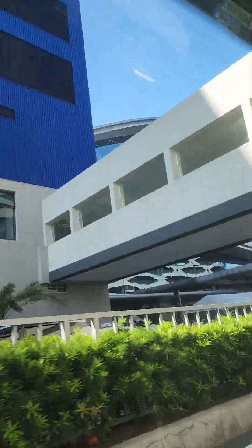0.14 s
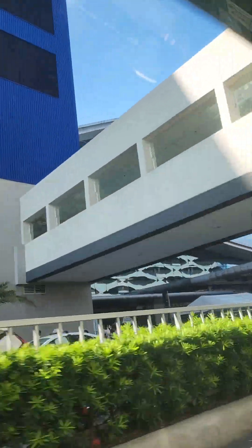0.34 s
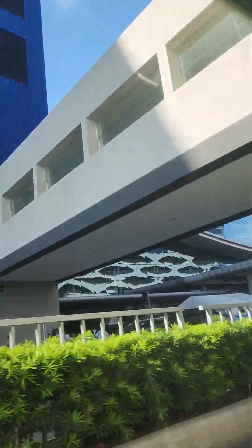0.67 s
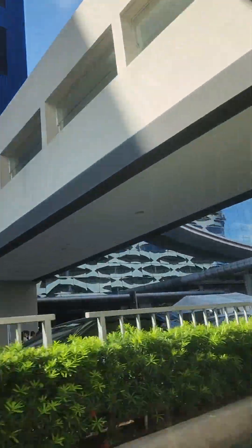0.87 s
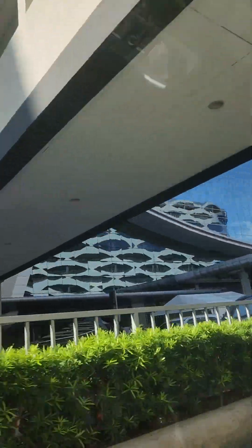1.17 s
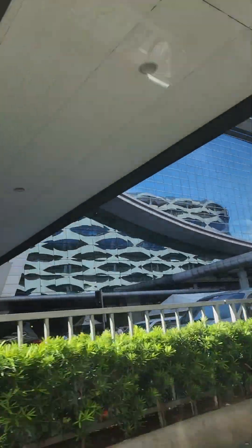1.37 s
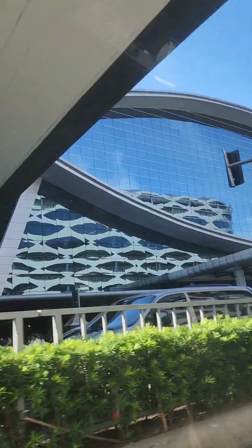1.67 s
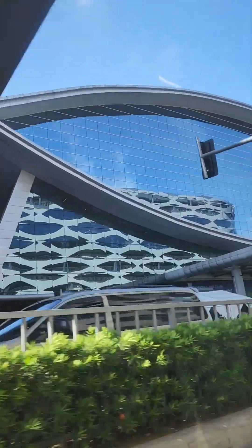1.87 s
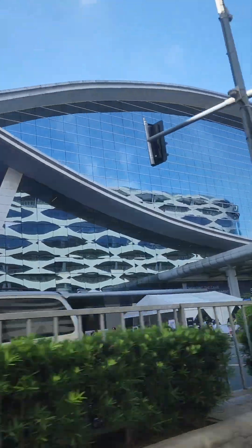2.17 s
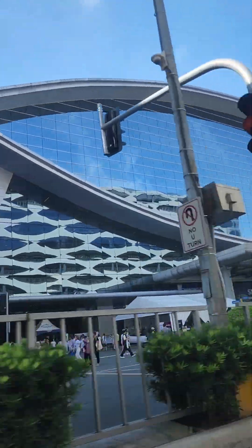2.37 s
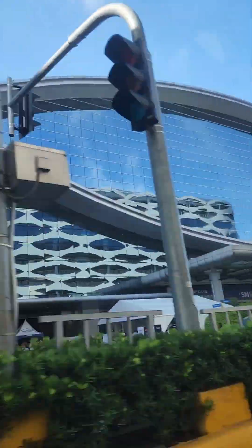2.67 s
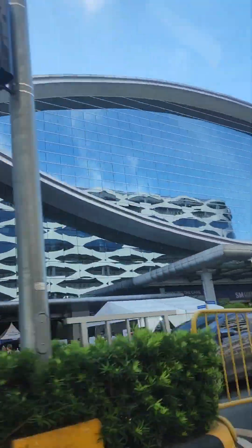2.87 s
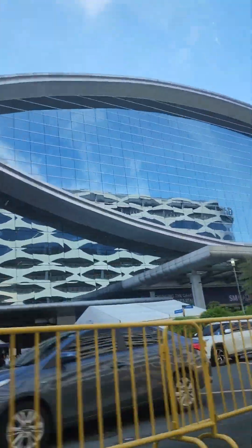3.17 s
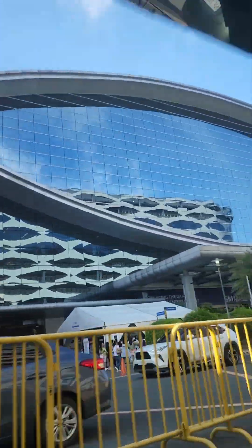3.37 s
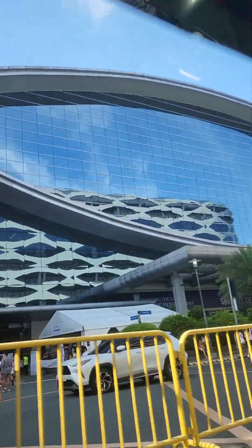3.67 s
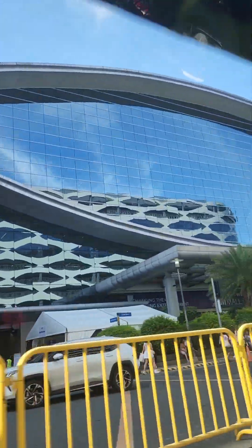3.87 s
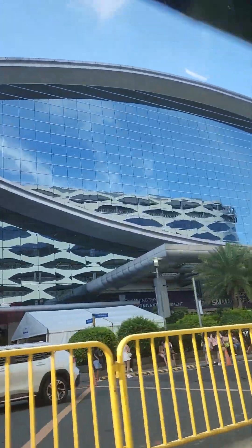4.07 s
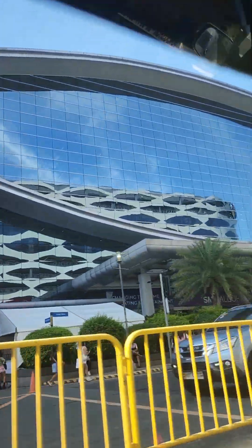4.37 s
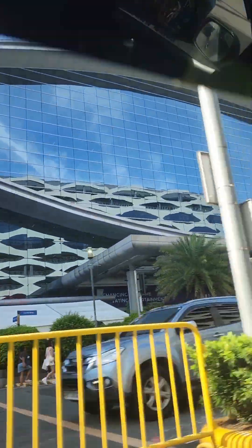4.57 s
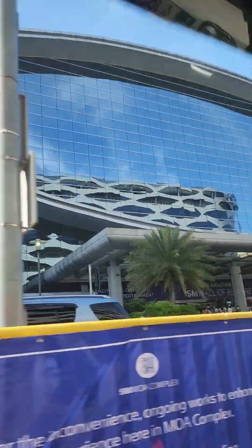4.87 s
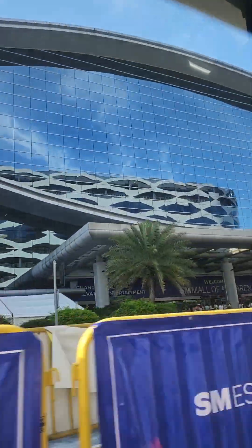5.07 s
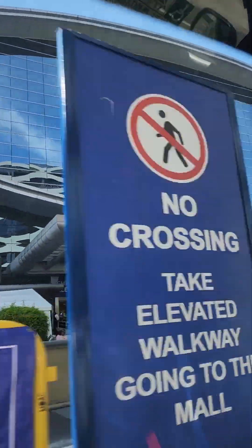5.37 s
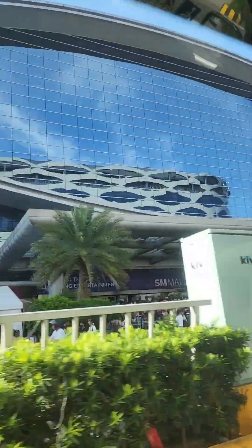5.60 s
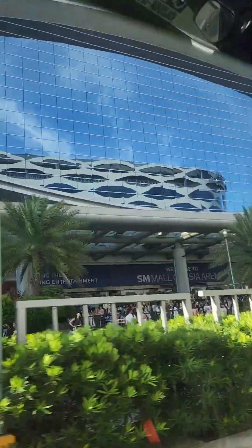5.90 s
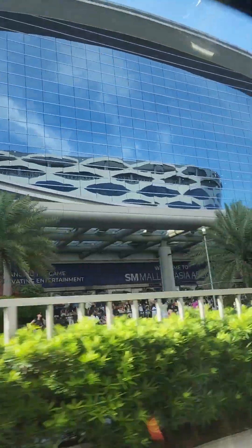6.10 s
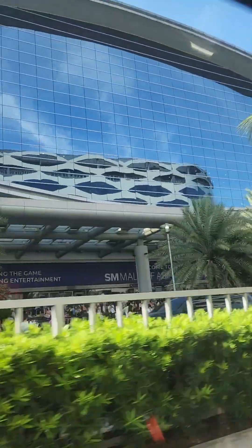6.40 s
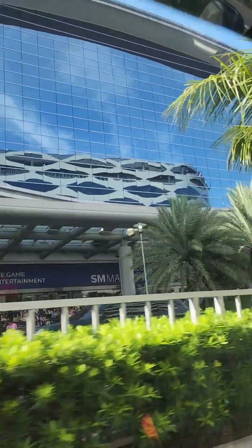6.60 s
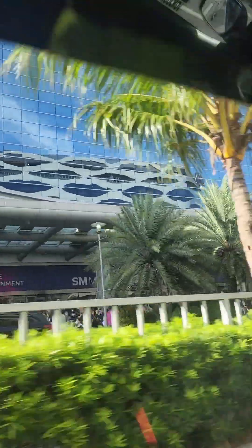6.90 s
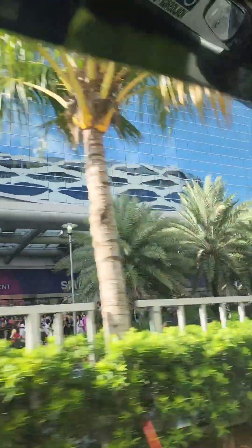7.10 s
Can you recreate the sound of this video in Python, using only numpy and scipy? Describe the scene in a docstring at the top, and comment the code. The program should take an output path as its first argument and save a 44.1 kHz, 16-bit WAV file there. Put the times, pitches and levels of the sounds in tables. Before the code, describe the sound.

Inside a slowly moving car, close stereo microphones at the passenger seat. From 0 to 2.4 s a steady deep rumble and boomy panel drone fill the cabin, over a soft low engine hum near 50 Hz, dull muffled tyre roar and faint vent hiss with a sizzle of coarse tread; gentle dips make the bass swell around 1 s. At 2.4 s a rough stretch begins: strong low heaves, clustered hollow suspension knocks and shuddering panels, plastic ticks and short rattles, with hard bright snaps at 2.6 and 2.9 s. Around 3.1 s the coarse sizzle fades and the roar eases; knocks thin out by 3.5 s, with a heavy thud at 3.65. From 4.2 to 5.9 s the engine hum swells, then rises slightly in pitch, while irregular seam thumps and tiny trim ticks continue. After 6 s everything smooths into a softer, quieter rumble, with a low boom near 7.1 s.

```python
"""Inside a car rolling slowly along a city street, heard at the passenger seat by two close microphones.
Shaped noise makes the body's deep rumble and the cabin's drone over a soft engine hum of a few sines.
The tyres roar dully and the vents hiss; the roar eases and a sizzle of tread ends with the coarse asphalt.
Dips rock the car; a rough stretch and later seams strike decaying knocks from the suspension,
and short noise bursts and crowds of clicks make loose trim tick, snap and rattle."""
import sys
import numpy as np
from scipy import signal
from scipy.fft import rfft, irfft, next_fast_len
from scipy.io import wavfile
from scipy.ndimage import uniform_filter1d

SR = 44100
rng = np.random.default_rng(int(sys.argv[2]) if len(sys.argv) > 2 else 0)


def unload_audio(sound):
    """Save the sound as a 16-bit wav file, at the path given as the first command line argument."""
    columns = np.transpose(np.atleast_2d(sound))
    # keep every value between -1 and 1, then stretch to whole-number steps
    steps = np.round(np.clip(columns, -1, 1) * 32767)
    wavfile.write(sys.argv[1], SR, steps.astype(np.int16))


N = 319706
TIME = np.arange(N) / SR  # s

# How rough the road is, driving several layers together. Each row: time in seconds, roughness in dB.
ROAD_ROUGHNESS = [(0, 0), (.7, -1.8), (2.3, -0.5), (2.85, -1), (3.25, 2.5), (3.55, -4), (3.85, -5),
                  (4.2, -2.5), (4.6, -2.5), (5, -1.5), (5.8, -2), (6.25, -5.5), (7.25, -6)]
# Coarse asphalt gives way to a quieter surface; the crossing is a smooth step.
COARSE_ENDS_S, CROSSING_S, COARSE_ROAR_DB = 3.14, 0.083, 2.5
# Levels at roughness 0 dB, and the dB that each gains per dB of roughness.
HEAVE_DB, HEAVE_PER_DB = -21.5, 0.66
BOOM_DB, BOOM_PER_DB = -17.5, 1.45
TYRE_DB, TYRE_PER_DB = -34, 0.81
VENT_DB, HISS_PER_DB = -49.5, 0.09
SIZZLE_DB = -50  # on coarse asphalt
# Slow wavering of narrow bands.
BOOM_DRIFT_DB, TYRE_DRIFT_DB, VENT_DRIFT_DB, SIZZLE_DRIFT_DB = 2.0, 1.34, 1.64, 2

# Balance of the cabin at the microphones. Each row: frequency in Hz, left minus right in dB.
LEFT_RIGHT_LEAN = [(50, 0.45), (200, 0), (320, 2.5), (480, -1.5), (800, -1), (1250, 1), (1650, -4),
                   (2300, -7.5), (3500, 0.5), (4500, -3.5), (6500, -2), (9300, -5.5), (11000, -2),
                   (14000, 1)]
# Spread of the cabin sound. Each row: frequency in Hz, side minus mid in dB.
STEREO_WIDTH = [(30, -23.5), (90, -24), (135, -21.5), (180, -19), (300, -18.5), (550, -6.5), (900, -0.5),
                (1250, 2.5), (2000, -2.5), (3000, 0), (5000, 0.5)]
# Hollow resonances of ducts and dashboard, which each source takes up more or less strongly.
# Each row: frequency in Hz, width in Hz, lift in dB at full weight.
DUCT_RESONANCES = [(659, 8.7, 11), (1282, 71, 7.5), (1658, 45, 8), (1970, 12, 5.5), (2040, 72, 5.5),
                   (4776, 24, -1.5), (6330, 60, 5.5), (7400, 100, 4.5), (9630, 14, 4)]

# Colour of the vent hiss. Each row: frequency in Hz, relative level in dB per Hz.
VENT_COLOUR = [(300, 6), (1000, -7.5), (1450, 2.5), (2150, 1.5), (2800, -1.5), (3600, -7.5), (4800, -6.5),
               (5700, -9.5), (6400, -7.5), (7500, -10), (9000, -18), (10300, -18.5), (11200, -22.5),
               (13600, -20.5), (16000, -24.5)]
# Colour of the tread's extra hiss on coarse asphalt. Each row: frequency in Hz, relative level in dB per Hz.
SIZZLE_COLOUR = [(300, 7), (1000, -1.5), (1500, 2), (2150, 0), (2900, -1.5), (3500, -8.5), (4800, -4.5),
                 (5800, -8), (6300, -2), (6700, -7.5), (7600, -8.5), (8400, -10.5), (9200, -18.5),
                 (10300, -15.5), (11200, -23.5), (13600, -15.5), (15500, -20)]

# Colour of struck loose trim. Each row: frequency in Hz, relative level in dB per Hz.
TRIM_COLOUR = [(150, -18.5), (400, -6), (1000, 11), (2500, 2), (4000, -4.5), (7300, -6.5), (8500, -12),
               (14000, -18.5), (16000, -17.5)]
# Loose trim set rattling, each bout swelling and dying away.
# Each row: loudest at seconds, level in dB, half length in seconds, bright above Hz.
RATTLE_BOUTS = [(2.52, -49, 0.057, 1500), (2.877, -48, 0.022, 3500), (3.031, -63, 0.026, 1190),
                (3.256, -56.5, .11, 3000), (3.402, -55, 0.033, 1000), (4.247, -59, 0.045, 3000),
                (5.096, -58, 0.028, 500), (5.69, -57, .03, 500), (5.76, -51, 0.033, 488)]
RATTLE_REST_DB = -67  # the faint chatter between bouts, at roughness 0 dB
# Small plastic parts ticking. Each row: start in seconds, level in dB before a common 13 dB cut,
# ring in Hz, ring width in Hz, ring lift in dB, contact decay in seconds, left minus right in dB.
TRIM_TICKS = [(2.4452, -33, 3120, 900, 15, 0.00081, 4), (2.5125, -40, 3800, 1600, 4, .0015, 2),
              (2.7145, -37, 3200, 1300, 12, 0.003, 2), (2.7516, -39, 4300, 1800, 8, 0.0065, 3),
              (2.834, -40, 3830, 1500, 10, .003, 3), (3.045, -40, 5900, 2010, 18, .004, -1),
              (3.262, -42, 7560, 3000, 10, .0015, 2), (4.219, -40, 5010, 2000, 4, 0.0022, -3),
              (4.272, -42, 12200, 4800, 10, .0015, -3), (4.605, -40, 11900, 4800, 7, 0.00093, -3),
              (4.733, -43, 5000, 2000, 7, .001, -3), (5.574, -41, 2000, 800, 10, 0.0028, -1),
              (5.677, -40, 3480, 2000, 6, 0.002, 6), (5.711, -40, 4500, 1800, 2, .003, 1)]
# A stiff panel snapping in its clips on the hardest jolts.
# Each row: start in seconds, level in dB, ring in Hz, ring lift in dB.
PANEL_SNAPS = [(2.5946, -32.5, 6600, 2), (2.9092, -32.5, 6700, 11.5)]
# Colour of a snap. Each row: frequency in Hz, relative level in dB per Hz.
SNAP_COLOUR_CURVE = [(150, -4), (400, 7.5), (750, 0), (1250, -5), (2000, -13), (3200, -17), (4700, -18.5),
                     (7300, -16), (8500, -25), (9500, -28), (12500, -23), (16000, -27)]
# The right microphone faces away from the panel. Each row: frequency in Hz, gain in dB.
RIGHT_SHADE = [(600, 0), (1250, -5), (2500, -4), (7000, -10), (14000, -14)]
SNAP_SWEEP_HZ_PER_S = 8900000  # each snap zips upward from a dull knock to a bright crack

# Colour of the tyre roar. Each row: frequency in Hz, relative level in dB per Hz.
TYRE_COLOUR = [(120, -6), (230, 2), (310, -1), (355, -4), (395, 3), (500, -4.5), (580, -8.5), (740, -14),
               (930, -12), (1150, -22.5), (1600, -27.5), (3000, -41), (16000, -80)]

# The engine's course. Each row: time in seconds, mean firing rate in Hz, level in dB before a 2.5 dB cut.
ENGINE_COURSE = [(0, 48.4, -32.5), (.6, 46.2, -33), (1.8, 46.3, -30.5), (2.5, 50.12, -23),
                 (3.6, 48.86, -31), (4.5, 50.1, -18), (5.05, 55.35, -23), (5.8, 55, -25.5),
                 (6.3, 50, -32.5), (7.25, 49.1, -38)]
# Harmonics of the hum. Each row: multiple of the firing rate, relative level in dB before it wanders.
FIRING_ORDERS = [(1, 5), (2, -18), (3, -28), (4, -11.5)]

# The drone, a broad air resonance above the boom. Each row: time in seconds, level in dB before the trim.
DRONE_LEVEL = [(0, -30), (.4, -26), (1.5, -29), (2.05, -26), (2.9, -26.5), (3.4, -29.5), (3.7, -31.5),
               (4.05, -30), (4.6, -31), (5.9, -28), (6.3, -33), (7.25, -36.5)]
DRONE_TRIM_DB = -1
# Colour of the drone. Each row: frequency in Hz, relative level in dB per Hz.
DRONE_CURVE = [(100, -39.5), (145, -8.5), (165, -1.5), (187, -3), (212, -15.5), (300, -44), (2000, -130)]

# Small pits and stones between the big dents. Each row: time in seconds, level in dB.
GRUMBLE_LEVEL = [(0, -42.5), (2.3, -42.5), (2.45, -37), (3.4, -36.5), (3.55, -49), (4.1, -41.5),
                 (4.5, -39.5), (5.7, -42.5), (6.2, -43.5), (7.25, -46.5)]
PITS_PER_S, PIT_LOW_HZ, PIT_HIGH_HZ, PIT_SPREAD_DB = 130, 219.5, 639.6, 2
# Wheels meeting seams and dents. Each row: start in seconds, knock in dB, knock ring in Hz,
# shudder in dB before a common 13 dB cut, shudder decay in seconds, shudder tilt in dB per octave.
WHEEL_BUMPS = [(2.418, -20, 370, -20.5, 0.09, 4), (2.485, -24, 543, -17, 0.015, -3.5),
               (2.551, -18, 237, -20, 0.01, 3.5), (2.596, -15, 251, -9.5, 0.0079, -4),
               (2.622, -28, 372, -29, 0.0067, 0), (2.694, -23, 276, -44, 0.013, 1),
               (2.718, -35, 610, -30, .015, 3), (2.752, -23.5, 446, -28, 0.018, 3),
               (2.84, -19.5, 481, -20, 0.043, 3.5), (2.879, -33.5, 714, -39, 0.016, 8),
               (2.903, -14, 254, -18, 0.01, 3.5), (2.98, -32, 510, -18.5, 0.042, -1),
               (3.016, -25, 366, -22, 0.032, 4), (3.087, -18, 302, -31, 0.02, 0),
               (3.155, -25, 427, -34, 0.016, 7), (3.221, -28, 252, -19, .035, 3),
               (3.248, -31, 540, -31, 0.022, 1), (3.299, -24.5, 466, -25, 0.021, -10),
               (3.378, -20, 296, -24, 0.03, 2.5), (3.39, -20.5, 330, -34, .012, 5.5),
               (3.463, -29, 300, -36, 0.0082, 5.5), (3.664, -20, 315, -10.5, 0.035, -8),
               (3.834, -26, 400, -27, .025, 1), (4.164, -35, 420, -17.5, 0.015, -9.5),
               (4.372, -19.5, 286, -30, 0.027, -7), (4.443, -34, 228, -15.5, 0.013, -7),
               (4.488, -29, 420, -26.5, 0.023, 1.5), (4.66, -19, 321, -15, 0.046, -4.5),
               (4.796, -23, 347, -18.5, 0.023, -3), (4.92, -25, 438, -22.5, 0.044, 2),
               (4.967, -22.5, 377, -18, 0.023, 0), (5.079, -24, 426, -22, 0.043, 3),
               (5.101, -21, 308, -28.5, 0.01, -4.5), (5.243, -26, 229, -24, 0.011, 2.5),
               (5.412, -17.5, 305, -17.5, 0.019, -2), (5.425, -26, 520, -31.5, 0.018, 4.5),
               (5.504, -37, 593, -35, .012, 1), (5.522, -29, 423, -41, 0.013, 0),
               (5.612, -25, 375, -26.5, 0.021, 3.5), (5.666, -31, 256, -26, 0.052, 4.5),
               (5.78, -24, 386, -38, .012, 5), (5.879, -27, 410, -29, 0.014, 0)]
# Colour of the panels' shudder before its tilt. Each row: frequency in Hz, relative level in dB per Hz.
SHUDDER_COLOUR = [(40, -9), (110, 9.5), (200, 3.5), (320, 0.5), (450, -7), (620, -13.5), (1000, -24.5),
                  (2500, -43.5), (16000, -81)]
# Colour of the tread's crunch. Each row: frequency in Hz, relative level in dB per Hz.
CRUNCH_COLOUR = [(200, -18), (450, 1.5), (800, -5.5), (1200, -11.5), (2500, -27.5), (16000, -72)]
CRUNCH_DB, CRUNCH_S = -15.5, 0.0096  # level against the knock, decay
BUMP_RISE_S = 0.0071
KNOCK_S = 0.0049  # time a knock takes to peak; it dies away about as fast
KNOCK_LAG_S = 0.00023  # a knock reaches the right microphone this much later

# Colour of the suspension's heave. Each row: frequency in Hz, relative level in dB per Hz.
HEAVE_COLOUR = [(10, -32.5), (21, -20.5), (29, 2), (32, -4), (38, -5.5), (46, 4.5), (56, 3), (65, -1),
                (85, -22.5), (2000, -130)]
# Colour of the booming panels. Each row: frequency in Hz, relative level in dB per Hz.
BOOM_COLOUR = [(40, -22), (64, -4.5), (80, -1.5), (92, 3), (108, -5), (122, 0), (138, -7), (188, -14),
               (212, -26), (300, -29), (4000, -120)]
# Long dips that rock the car and set its panels booming.
# Each row: deepest at seconds, heave change in dB, boom change in dB.
ROAD_DIPS = [(.22, -2, 2.5), (1.04, -2, 5.5), (1.291, -6, 4.5), (1.95, 4.5, 1.5), (2.5, 14.5, 1),
             (2.81, 9.5, 2.5), (3.07, 6.5, -0.5), (4.39, 2, 4), (4.8, 3, 3), (5.11, 2.5, 3.5),
             (5.45, 7.5, 3.5), (5.72, 7.5, 2.5), (5.951, 0, 6.5), (7.12, -14, 8.5)]
DIP_S = 0.051  # half length of a dip
TOP_HZ = 15700


def undb(db):
    """Decibels to gain."""
    return 10 ** (np.asarray(db) / 20)


def unit(x):
    """Scale to rms 1."""
    return x / np.sqrt(np.mean(x ** 2))


def curves(table):
    """The columns of a time table, sample by sample."""
    s, *columns = np.transpose(table)
    return [np.interp(TIME, s, c) for c in columns]


def swell(s, half_s):
    """A smooth rise to 1 at time s and back."""
    return np.exp(-((TIME - s) / half_s) ** 2)


def walk(rate):
    """A smooth random wander of spread 1, slower than about rate in Hz."""
    size = next_fast_len(N)
    f = np.fft.rfftfreq(size, 1 / SR)
    slow = rfft(rng.standard_normal(size)) * np.exp(-(f / rate) ** 2)
    return unit(irfft(slow, size)[:N])


def gains(points, size):
    """A (Hz, dB) table as gains on the bins of a transform."""
    hz, db = np.transpose(points)
    f = np.fft.rfftfreq(size, 1 / SR)
    return undb(np.interp(np.log(f + 1), np.log(hz), db))


def resonances(modes, size):
    """Gains of bell-shaped resonances on the bins of a transform."""
    f = np.fft.rfftfreq(size, 1 / SR)
    return undb(sum(db / (1 + (2 * (f - hz) / width) ** 2) for hz, width, db in modes))


def reflections(count=80):
    """Early echoes off glass and dashboard, 5 to 30 ms late, ripple the spectrum differently at each microphone."""
    echoes = np.zeros((2, N))
    for port in echoes:
        port[rng.integers(SR // 200, SR // 33, count)] = rng.standard_normal(count)
    return undb(1.2 * unit(rfft(echoes).real))


def ring(x, gain):
    """Pass x through a causal body with these gains: it rings only after it is struck."""
    size = x.shape[-1]
    cepstrum = irfft(np.log(gain), size)  # folded forward in time for minimum phase
    cepstrum[1:size // 2] *= 2
    cepstrum[size // 2 + 1:] = 0
    return irfft(rfft(x) * np.exp(rfft(cepstrum)), size)


def cabin_noise(size):
    """Diffuse sound at two microphones: alike in the bass, unrelated in the treble, uneven left to right."""
    mid, side = rfft(rng.standard_normal((2, size)))
    width = gains(STEREO_WIDTH, size)
    lean = gains(LEFT_RIGHT_LEAN, size) ** .5
    pair = np.array([(mid + width * side) * lean, (mid - width * side) / lean])
    return irfft(pair / np.sqrt(1 + width ** 2), size)


def burst(envelope):
    """A short burst of noise with an even spectrum, free of chance holes."""
    spectrum = rfft(rng.standard_normal(len(envelope)) * envelope)
    local_power = uniform_filter1d(abs(spectrum) ** 2, size=41)
    return irfft(spectrum / np.sqrt(local_power + 1e-18), len(envelope))


def steady(x, seconds, share):
    """Take a share of the slow chance swells out of a noise."""
    power = uniform_filter1d(np.mean(x ** 2, axis=0), max(int(seconds * SR), 2))
    return unit(x / power ** (min(share, 1) / 2))


def drift(x, depth_db, size=2048, count=11):
    """Narrow bands swell and fade on their own over a few tenths of a second, so the colour never sits still."""
    bands = signal.stft(x, nperseg=size)[2]
    wander = uniform_filter1d(rng.standard_normal(bands.shape[1:]), size=3, axis=0)
    for _ in range(2):
        wander = uniform_filter1d(wander, count, axis=1)
    moving = bands * undb(depth_db * unit(wander))
    return unit(signal.istft(moving, nperseg=size)[1][:, :N])


def add(out, s, sound):
    """Mix a short sound in at time s, with its ends eased."""
    start, size = int(s * SR), sound.shape[1]
    ease = np.interp(np.arange(size), [0, 30, size / 2, size], [0, 1, 1, 0])
    out[:, start:start + size] += (sound * ease)[:, :N - start]


def vents(level_db):
    """Air and road hiss come out of the dashboard ducts and sound their resonances."""
    colour = gains(VENT_COLOUR, N) * resonances(DUCT_RESONANCES, N) * reflections()
    hiss = irfft(rfft(cabin_noise(N)) * colour, N)
    return drift(hiss, VENT_DRIFT_DB) * undb(level_db + .5 * walk(39))


def sizzle(coarse):
    """Coarse asphalt adds a restless hiss that leaks in around the windows."""
    colour = gains(SIZZLE_COLOUR, N) * resonances(DUCT_RESONANCES, N) ** 1.4 * reflections()
    hiss = irfft(rfft(cabin_noise(N)) * colour, N)
    return drift(hiss, SIZZLE_DRIFT_DB) * coarse * undb(SIZZLE_DB + 1.6 * walk(20))


def chatter(rough_db, per_second=1100, rest_hz=3000):
    """Shaken trim rubs in a crowd of tiny clicks: faintly all the time, louder in short bouts."""
    struck = rng.random((2, N)) < per_second / SR
    sizes = undb(3 * np.minimum(rng.exponential(size=(2, N)), 4))
    clicks = ring(struck * rng.choice([-1, 1], (2, N)) * sizes, gains(TRIM_COLOUR, N))

    def bright(hz):
        """The clicks with their low end thinned, at rms 1."""
        return unit(signal.sosfilt(signal.butter(1, hz, "high", fs=SR, output="sos"), clicks))

    bouts = sum(bright(hz) * undb(db) * swell(s, half_s) for s, db, half_s, hz in RATTLE_BOUTS)
    return bouts + bright(rest_hz) * undb(RATTLE_REST_DB + rough_db + 2.4 * walk(22))


def ticks(tail_s=0.012, tail_db=-36, size=2048):
    """Trim taps against its clip: a hard contact, a brief plastic ring and a trace of cabin echo."""
    out, t = np.zeros((2, N)), np.arange(size) / SR
    for s, db, hz, width_hz, lift_db, contact_s, pan_db in TRIM_TICKS:
        strike = np.exp(-t / contact_s) + undb(tail_db) * np.exp(-t / tail_s)
        plastic = gains(TRIM_COLOUR, size) * resonances([(hz, width_hz, lift_db)], size)
        tick = np.array([unit(ring(burst(strike), plastic)) for port in range(2)])
        pan = np.array([pan_db, -pan_db])[:, None] / 2
        add(out, s, tick * undb(db - 13 + pan))
    return out


def snaps(ring_width_hz=1400, echo_s=0.0051, echo_db=-13, size=2048):
    """A panel lets go in one hard, broad crack that sweeps upward in 2 to 3 ms; the cabin echoes it briefly."""
    out, t, f = np.zeros((2, N)), np.arange(size) / SR, np.fft.rfftfreq(size, 1 / SR)
    sweep = np.exp(-1j * np.pi * f ** 2 / SNAP_SWEEP_HZ_PER_S)  # higher frequencies come later
    crack = np.roll(irfft(sweep, size), 32)
    for s, db, hz, lift_db in PANEL_SNAPS:
        panel = gains(SNAP_COLOUR_CURVE, size) * resonances([(hz, ring_width_hz, lift_db)], size)
        left = unit(ring(crack, panel))
        right = ring(left, gains(RIGHT_SHADE, size))
        echo = unit(ring(cabin_noise(size) * np.exp(-t / echo_s), gains(TRIM_COLOUR, size)))
        add(out, s, (np.array([left, right]) + undb(echo_db) * echo) * undb(db))
    return out


def tyres(level_db):
    """Tread on asphalt, muffled by the doors, fluttering with the grain of the road."""
    colour = gains(TYRE_COLOUR, N) * resonances(DUCT_RESONANCES, N) ** 0.6 * reflections()
    roar = drift(irfft(rfft(cabin_noise(N)) * colour, N), TYRE_DRIFT_DB)
    return steady(roar, seconds=0.029, share=0.18) * undb(level_db + 0.81 * walk(4.7))


def engine():
    """Even firings, felt through the mounts as a slightly unsteady hum."""
    hz, level_db = curves(ENGINE_COURSE)
    unsteady_hz = hz * (1 + 0.01494 * walk(6.81))
    phase = 2 * np.pi * np.cumsum(unsteady_hz) / SR
    hum = sum(undb(db + 5.7 * walk(4.5)) * np.sin(multiple * phase) for multiple, db in FIRING_ORDERS)
    return unit(hum) * undb(level_db - 2.5)


def drone():
    """Road vibration keeps the air in the cabin droning, swelling and fading on its own."""
    level_db, = curves(DRONE_LEVEL)
    air = ring(cabin_noise(N), gains(DRONE_CURVE, N))
    return steady(air, seconds=0.21, share=0.96) * undb(level_db + DRONE_TRIM_DB)


def knock(hz, size):
    """A few cycles of hollow ring from the suspension, at both microphones."""
    t = np.arange(size) / SR
    age = np.maximum([t, t - KNOCK_LAG_S], 0)
    envelope = age / KNOCK_S * np.exp(1 - age / KNOCK_S)
    return envelope * np.sin(2 * np.pi * hz * age)


def grumble(size=1536):
    """Small pits keep the suspension knocking irregularly; the higher knocks tend to be weaker."""
    out, (level_db,) = np.zeros((2, N)), curves(GRUMBLE_LEVEL)
    for when, pitch, strength in rng.random((int(PITS_PER_S * N / SR), 3)):
        hz = PIT_LOW_HZ * (PIT_HIGH_HZ / PIT_LOW_HZ) ** pitch
        force = undb(-PIT_SPREAD_DB * np.log(1 - strength)) / hz ** 1.05
        add(out, when * N / SR, knock(hz, size) * force)
    return steady(out, seconds=0.09, share=0.46) * undb(level_db)


def bumps(size=8192):
    """Each dent crunches under the tread and knocks the suspension while panels shudder, deeper if tilted down."""
    out, t = np.zeros((2, N)), np.arange(size) / SR
    rise = 1 - np.exp(-t / BUMP_RISE_S)
    for s, knock_db, hz, shudder_db, decay_s, tilt_db in WHEEL_BUMPS:
        colour = gains([(f, lift + tilt_db * np.log2(f)) for f, lift in SHUDDER_COLOUR], size)
        shudder = unit(ring(cabin_noise(size) * rise * np.exp(-t / decay_s), colour))
        grit = unit(ring(cabin_noise(size), gains(CRUNCH_COLOUR, size)))
        crunch = grit * rise * np.exp(-t / CRUNCH_S)
        blow = (knock(hz, size) + crunch * undb(CRUNCH_DB)) * undb(knock_db)
        add(out, s, blow + shudder * undb(shudder_db - 13.0))
    return out


def body(rough_db):
    """The suspension heaves slowly while panels boom at the low cabin modes; roughness and dips set both levels."""
    heave_db = HEAVE_DB + HEAVE_PER_DB * rough_db
    boom_db = BOOM_DB + BOOM_PER_DB * rough_db
    for s, heave_change_db, boom_change_db in ROAD_DIPS:
        dip = swell(s, DIP_S)
        heave_db = heave_db + heave_change_db * dip
        boom_db = boom_db + boom_change_db * dip
    heave = steady(ring(cabin_noise(N), gains(HEAVE_COLOUR, N)), seconds=0.06, share=0.81)
    panels = drift(ring(cabin_noise(N), gains(BOOM_COLOUR, N)), BOOM_DRIFT_DB)
    boom = steady(panels, seconds=0.33, share=0.88)
    return heave * undb(heave_db) + boom * undb(boom_db)


def scene():
    """Everything heard from the passenger seat, much of it driven by the state of the road."""
    rough_db, = curves(ROAD_ROUGHNESS)
    coarse = (1 - np.tanh((TIME - COARSE_ENDS_S) / CROSSING_S)) / 2  # 1 on coarse asphalt, then 0
    roar_db = TYRE_DB + TYRE_PER_DB * rough_db + COARSE_ROAR_DB * coarse
    hiss_db = VENT_DB + HISS_PER_DB * rough_db
    air = vents(hiss_db) + sizzle(coarse)
    trim = chatter(rough_db) + ticks() + snaps()
    rolling = tyres(roar_db) + engine() + drone()
    suspension = grumble() + bumps()
    return air + trim + rolling + suspension + body(rough_db)


def record(dry):
    """The phone holding the microphones cuts the top with a steep low-pass."""
    return signal.sosfilt(signal.ellip(10, .2, 70, TOP_HZ, fs=SR, output="sos"), dry)


dry = scene()
out = record(dry)
unload_audio(out)
```